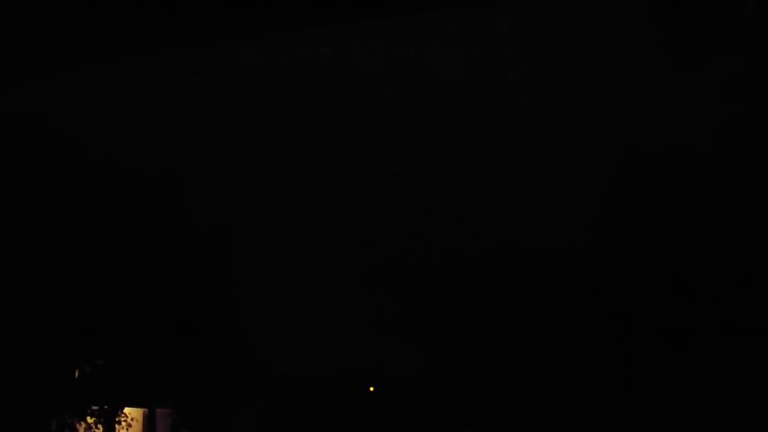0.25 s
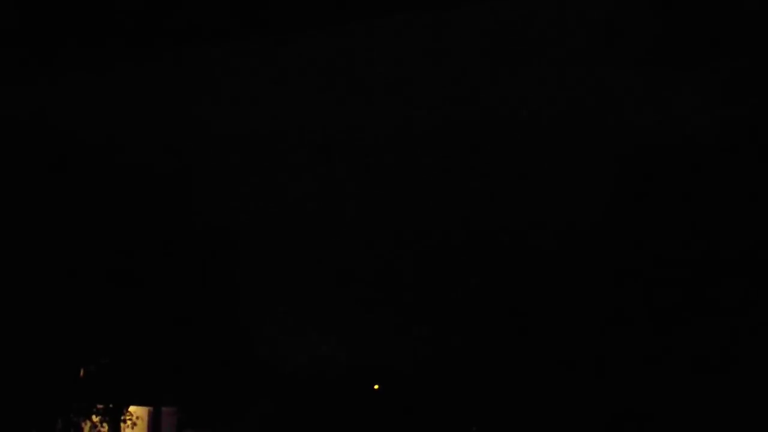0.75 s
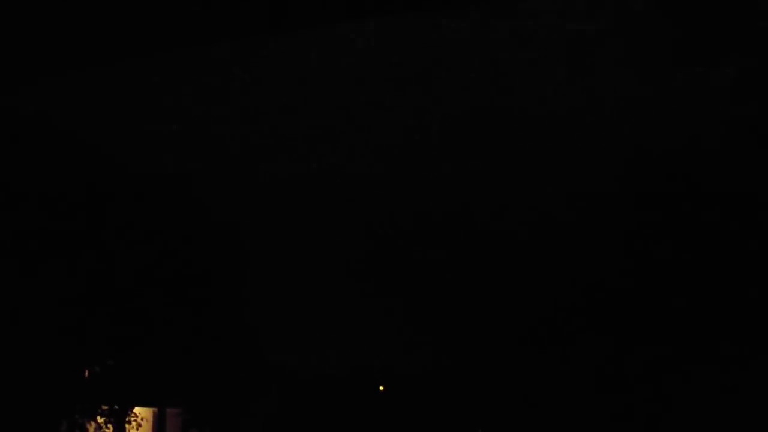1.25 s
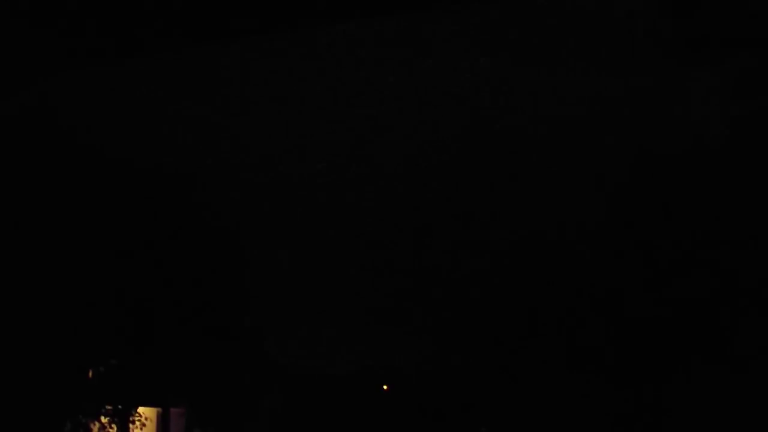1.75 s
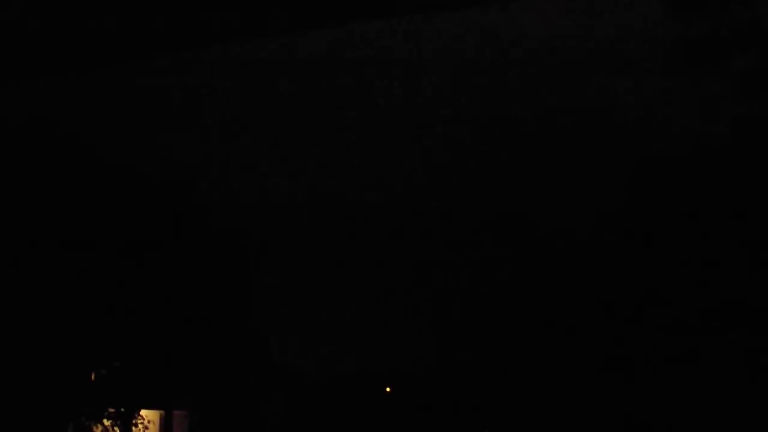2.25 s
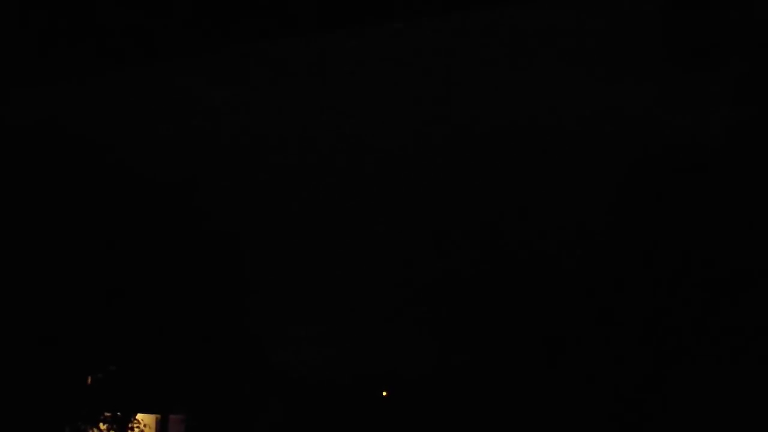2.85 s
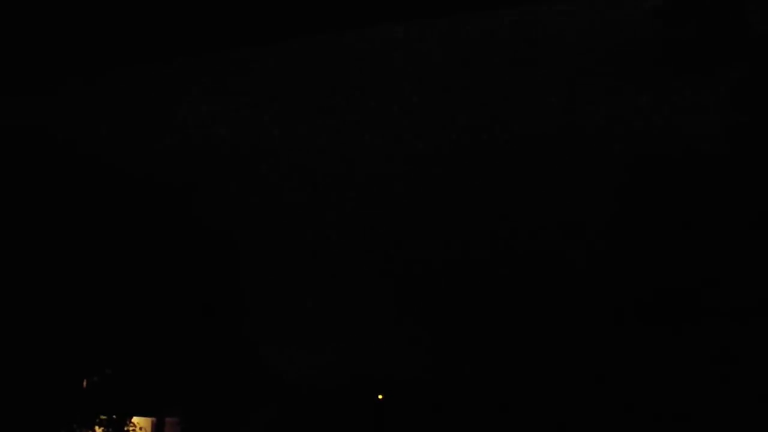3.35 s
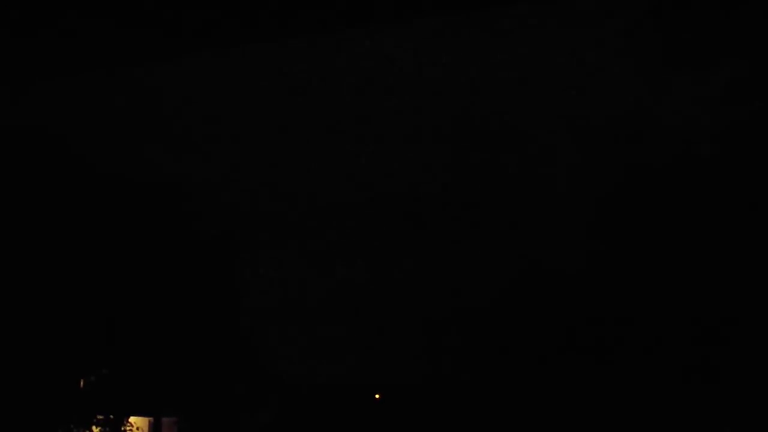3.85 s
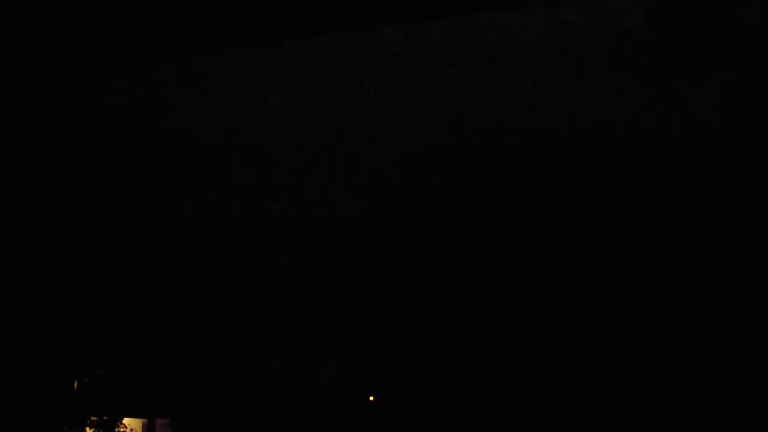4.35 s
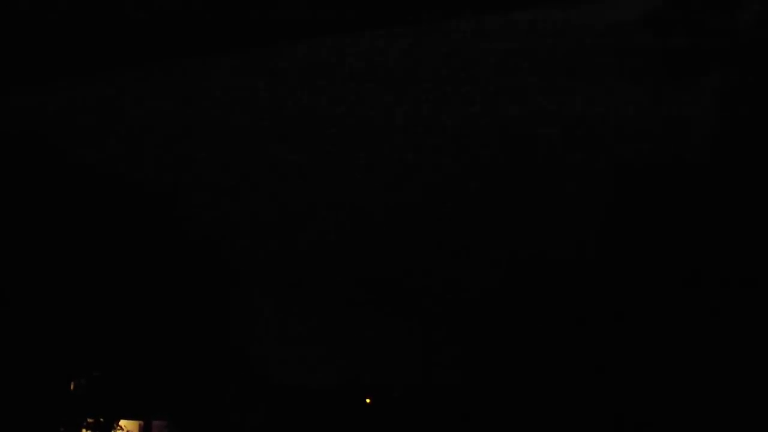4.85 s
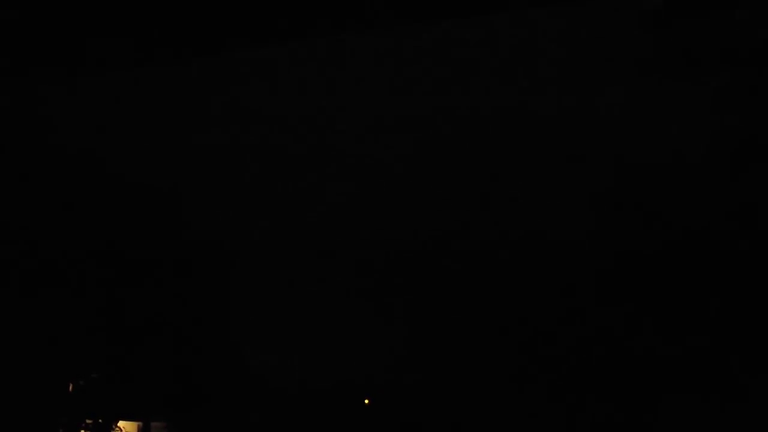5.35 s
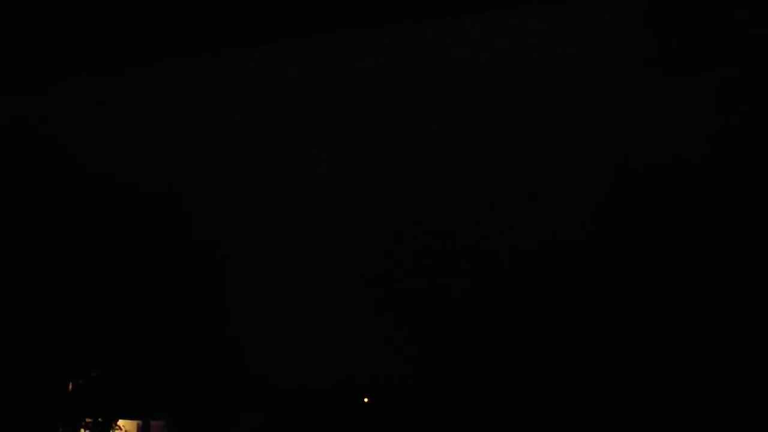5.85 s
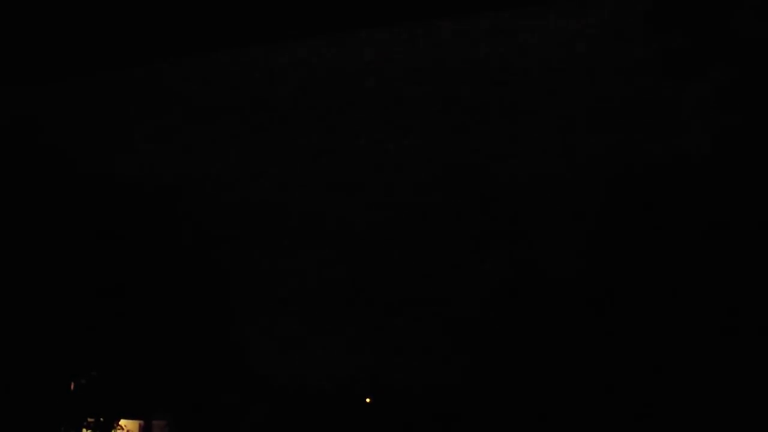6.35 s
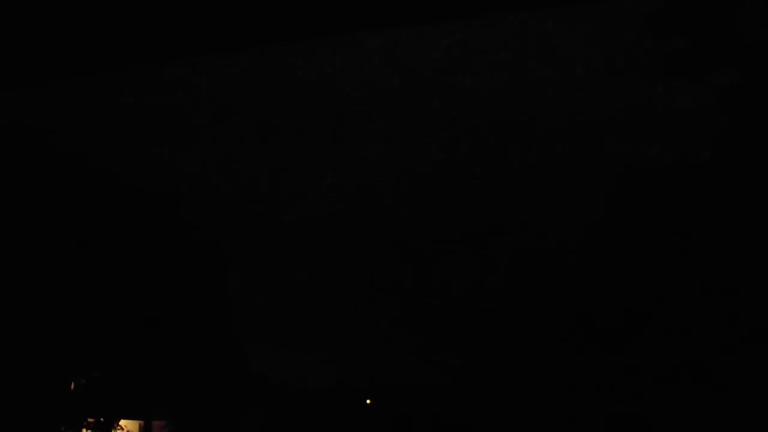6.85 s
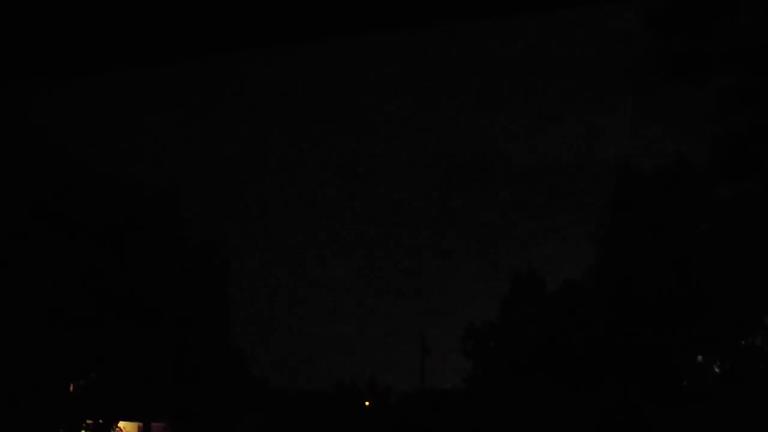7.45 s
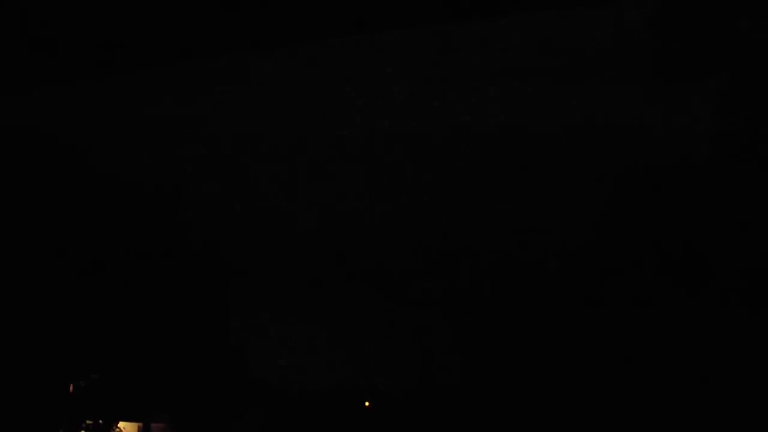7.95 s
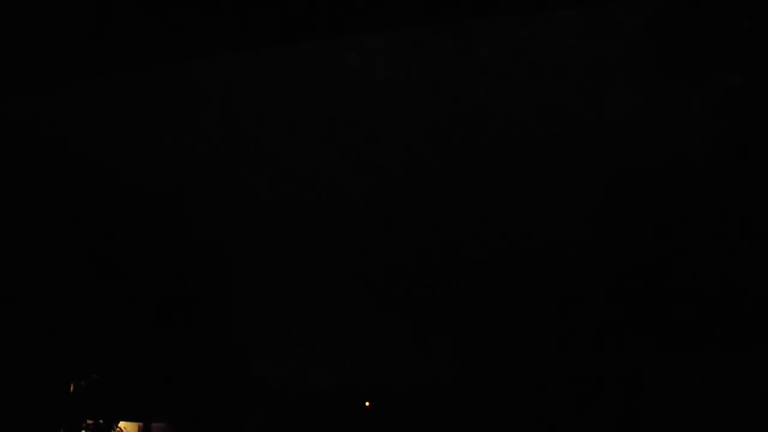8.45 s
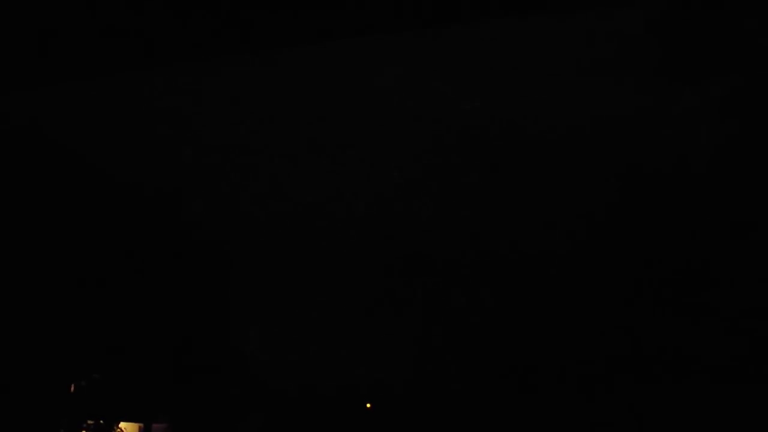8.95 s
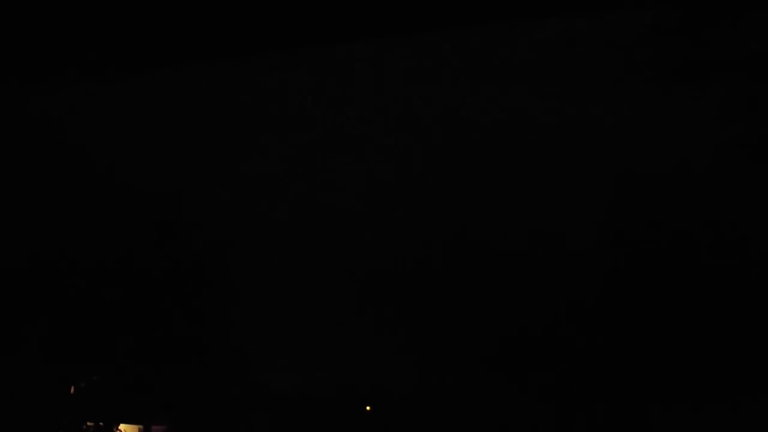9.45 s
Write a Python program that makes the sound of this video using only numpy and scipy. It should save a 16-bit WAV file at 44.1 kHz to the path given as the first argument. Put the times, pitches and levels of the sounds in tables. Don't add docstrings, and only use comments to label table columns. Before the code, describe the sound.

Distant thunder rumbles in dull overlapping rolls at night, fading, then swelling to a stronger peak, under a steady close camera-motor whirr and hiss.

```python
import sys
import numpy as np
from scipy import signal
from scipy.fft import rfft, irfft
from scipy.io import wavfile
from scipy.ndimage import uniform_filter1d

SR = 44100
rng = np.random.default_rng(int(sys.argv[2]) if len(sys.argv) > 2 else 0)


def generate_wav(signal):
    frames = np.transpose(np.atleast_2d(signal))
    scaled = np.clip(frames, -1, 1) * 32767
    pcm = np.round(scaled).astype(np.int16)
    wavfile.write(sys.argv[1], SR, pcm)


def how_loud(loudness_db):
    steps = np.asarray(loudness_db, float) / 20
    return 10 ** steps


N = 427329
HZ = np.fft.rfftfreq(N, 1 / SR)
T = np.arange(N) / SR


def evened(x):
    return x / np.sqrt(np.mean(x ** 2) + 1e-20)


def coloured(x, points):
    f, db = np.transpose(points)
    gain_db = np.interp(np.log(HZ + 1), np.log(f + 1), db)
    return irfft(rfft(x) * how_loud(gain_db), N)


def wander(hz):
    return evened(irfft(rfft(rng.standard_normal(N)) / (1 + (HZ / hz) ** 2), N))


def bumps(rows):
    t = T[::64]
    rise_db = sum(db * np.exp(-((t - at) / length) ** 2) for at, db, length in rows)
    return np.interp(T, t, rise_db)


def resonate(x, hz, width):
    r = np.exp(-np.pi * width / SR)
    poles = [1, -2 * r * np.cos(2 * np.pi * hz / SR), r * r]
    once = signal.lfilter([1], poles, x)
    return signal.lfilter([1, 0, -1], poles, once)


def steadied(x, size, depth):
    x = evened(x)
    power = uniform_filter1d(uniform_filter1d(x ** 2, size), size)
    return evened(x / (power + 0.046) ** depth)


def add(mix, at, sound):
    part = mix[at:][:len(sound)]
    part += sound[:len(part)]


def shocks(count, per_s, spread_db):
    hit, sign, size = rng.random((count, 3)).T
    return (hit < per_s / SR) * np.sign(sign - .5) * how_loud(-spread_db * np.log(size + 0.021))


def yard(spectrum):
    # pitch in Hz, width in Hz, level in dB re direct.
    pockets = [(38, 7.5, -2), (63.5, 9.3, 4), (117, 33, -3), (166.7, 15.6, 2), (220.8, 5.7, -1),
               (255, 9.3, -0.5), (298.2, 13, 0), (358.2, 9.3, 1), (400, 9.3, -2.5)]
    ring = sum(how_loud(db) / (1 + 2j * (HZ - hz) / width) for hz, width, db in pockets)
    air = 1 / (1 + (HZ / 1350) ** 8)
    return (1 + ring) * air * spectrum


def roll():
    # time in seconds, strength in dB, nearness in dB of treble.
    strokes = [(0.0, -36.5, 2), (0.25, -34, -2), (0.501, -39, 1), (1.05, -35, -2), (1.7, -38, -0.5),
               (2.2, -40.5, 1), (3.7, -45.5, 1), (4.45, -39.5, -6), (4.62, -32, 1), (5.2, -33, 0),
               (5.32, -28, 0.5), (5.7, -29, -5), (6.1, -33, -4.5), (7.0, -27, -2), (7.68, -25.5, 1.5),
               (8.4, -33.5, 3), (8.9, -31, 3), (9.69, -31, -4)]
    # frequency in Hz, level in dB per Hz.
    thunder_colour = [(12, -32), (24, -5.5), (38, 4.5), (52, -10), (64, -7), (84, -7), (100, -1.5),
                      (150, 1), (260, 0), (340, -4), (500, -11), (850, -16), (950, -20), (1300, -32)]
    borders = [85, 200, 430, 860]
    # level in dB at middle strength, share of strength, share of nearness, surge in dB, surges per s.
    ranges = [
        (-44, 0.61, -.3, 2, 17),
        (-44, 0.65, 0.05, 2, 3.7),
        (-43, 0.92, .1, 1.5, 9.2),
        (-49, 0.97, .9, 1.34, 5.6),
        (-62, 0.99, 1.2, 0.5, 7.1),
    ]
    # time in seconds, rise in dB, length in seconds.
    heaves = [(.75, 4, .08), (2.3, 6, .1), (3.65, 6, 0.12), (4.6, 7, 0.16), (5.95, -5, 0.074),
              (6.92, 5, .06), (7.55, 5, 0.089), (7.7, 6.5, 0.089), (7.95, 3, 0.036), (0.972, 8, 0.096),
              (1.4, 1.5, 0.068), (1.757, 7.5, 0.2), (5.627, 4, 0.082), (6.204, 2, 0.066), (6.53, 2, 0.086),
              (7.2, 12.5, 0.14), (7.826, 3.5, 0.17), (8.5, 12, 0.05), (9.088, 9.5, 0.17), (9.39, 9.5, 0.17)]
    middle_db, ground_lag_s = -38, 0.85

    stream = shocks(N, per_s=2000, spread_db=1.5)
    spectrum = yard(rfft(coloured(stream, thunder_colour)))
    below = [0] + [1 / (1 + (HZ / hz) ** 6) for hz in borders] + [1]
    s, strength_db, near_db = np.transpose(strokes)
    strength_db = np.interp(T, s, strength_db) - middle_db
    near_db = np.interp(T, s, near_db)

    keep = np.exp(-1 / (ground_lag_s * SR))
    start_db = strength_db[0]
    ground_db = signal.lfilter([1 - keep], [1, -keep], strength_db - start_db) + start_db
    heave_db = bumps(heaves)

    out = np.zeros(N)
    for k, (db, follow, tilt, surge_db, hz) in enumerate(ranges):
        band = irfft(spectrum * (below[k + 1] - below[k]), N)
        if k == 0:
            drive_db = follow * ground_db + heave_db
            even = steadied(band, size=1800, depth=0.1)
        else:
            drive_db = follow * strength_db
            even = steadied(band, size=1800, depth=0.38)
        out += how_loud(db + drive_db + tilt * near_db + surge_db * wander(hz)) * even
    return out


def motor():
    # pitch in Hz, width in Hz, level in dB.
    housing = [(740, 1070, -53), (1290, 162, -49), (1441, 105, -50.5), (1646, 430, -58.5),
               (2216, 340, -55.5), (2542, 190, -56.5), (2793, 300, -54), (3054, 180, -51.5),
               (3287, 220, -42), (3562, 320, -51), (4336, 490, -51.5), (4697, 204, -55), (4928, 330, -50.5),
               (5600, 770, -62), (6505, 600, -65), (7340, 420, -67.5), (7840, 560, -63.5), (8560, 660, -75)]
    gear_tones = {5: -79, 7: -72, 8: -60, 12: -70, 14: -86, 15: -78, 18: -78, 19: -84, 20: -70, 21: -92, 22:
                  -90, 25: -97, 27: -95}
    # time in seconds, rise in dB, length in seconds.
    strains = [
        (.59, 2, .04),
        (.85, 2, 0.18),
        (1.591, 3, .004),
        (1.91, 1, .05),
        (2.05, 2.5, 0.017),
        (4.4, 1, .15),
        (7.85, 1.5, 0.017),
        (8.7, 1.5, .08),
    ]
    tooth_hz = 401.07

    flutter_db = 0.45 * wander(11) + 0.69 * wander(29) + 0.64 * wander(300)
    friction = rng.standard_normal(N) * how_loud(bumps(strains) + flutter_db)
    whirr = np.zeros(N)
    for k, (hz, width, db) in enumerate(housing):
        breath = how_loud(db + 0.87 * wander(18))
        whirr += (-1) ** k * breath * evened(resonate(friction, hz, width))
    whine = sum(how_loud(db) * np.sin(2 * np.pi * (k * tooth_hz * T + rng.random()))
                for k, db in gear_tones.items())
    return whirr + np.sqrt(2) * whine


def electronics():
    leaks = {962: -70, 6543: -80, 7083: -88, 11472: -86}
    # frequency in Hz, level in dB per Hz.
    hiss_colour = [(100, 5), (9000, -0.8), (12000, -2), (16000, -3)]
    hiss = how_loud(-64 + 6) * evened(coloured(rng.standard_normal(N), hiss_colour))
    tones = sum(how_loud(db) * np.sin(2 * np.pi * (hz * T + rng.random())) for hz, db in leaks.items())
    return hiss + np.sqrt(2) * tones


def claps():
    # time in seconds, level in dB, centre in Hz, length in seconds, crackle in dB re level.
    near_claps = [(0.181, -28.5, 212, 0.1, -12), (0.801, -40, 216, 0.12, -10),
                  (1.02, -27.5, 248, 0.07, -18), (1.24, -28.0, 226, 0.065, -15),
                  (1.527, -31.5, 225, 0.067, -9), (1.92, -27.5, 146, 0.036, -10),
                  (2.001, -30, 150, 0.1, -11), (4.634, -24.5, 238, 0.068, -16),
                  (4.89, -29, 240, 0.014, -5.5), (5.051, -22.5, 180, 0.088, -36),
                  (5.296, -28.5, 240, 0.089, -12), (5.615, -27.5, 282, 0.07, -15),
                  (6.298, -28.5, 202, 0.094, -15), (6.688, -28, 221, 0.12, -14),
                  (6.814, -28.5, 212, 0.081, -16), (6.991, -26.5, 200, 0.071, -9),
                  (7.158, -26, 159, 0.11, -13), (7.397, -21.5, 193, 0.046, -14),
                  (7.652, -19.5, 264, 0.087, -3), (7.943, -25.5, 234, 0.037, -15),
                  (8.263, -27.5, 255, 0.029, -8), (8.49, -27, 248, 0.024, -25),
                  (8.915, -28.5, 202, 0.083, -12), (9.274, -25, 210, 0.072, -9.5)]
    # time in seconds, level in dB.
    far_thumps = [(0.535, -38), (.692, -34.5), (1.629, -32), (2.289, -38), (2.585, -40), (3.262, -36),
                  (3.958, -34), (4.379, -39), (4.468, -37), (4.803, -37), (5.84, -36), (9.601, -31)]
    bunches = near_claps + [(s, db, 192, 0.038, -13) for s, db in far_thumps]
    echo_db, echo_s = -8, 0.12

    out = np.zeros(N)
    u = np.arange(-SR // 8, SR // 4) / SR
    for s, db, hz, length, crackle_db in bunches:
        bunch = shocks(len(u), per_s=1200, spread_db=1.5)
        thump = steadied(resonate(bunch, hz, 1.08 * hz), size=400, depth=0.62)
        crackle = steadied(resonate(bunch, 440, 880), size=200, depth=0.52)
        swell = np.exp(-(u / (length * np.where(u < 0, .42, .33))) ** 2)
        echo = (u > 0) * how_loud(echo_db) * np.exp(-abs(u) / echo_s) * (1 - (4 * u) ** 4)
        clap = how_loud(db) * np.maximum(swell, echo) * (thump + how_loud(crackle_db) * crackle)
        add(out, max(round(s * SR) - SR // 8, 0), clap)
    no_bass = 1 - 1 / (1 + (HZ / 105) ** 6)
    return how_loud(-3.0) * irfft(no_bass * yard(rfft(out)), N)


def scene():
    return (roll() + motor() + electronics() + claps())[None]


def band_limit(x):
    return signal.sosfilt(signal.butter(12, 16330, fs=SR, output="sos"), x)


def record(dry):
    limited = irfft(rfft(dry) * (HZ < 15715), N)
    return band_limit(limited)


dry = scene()
out = record(dry)
generate_wav(out)
```